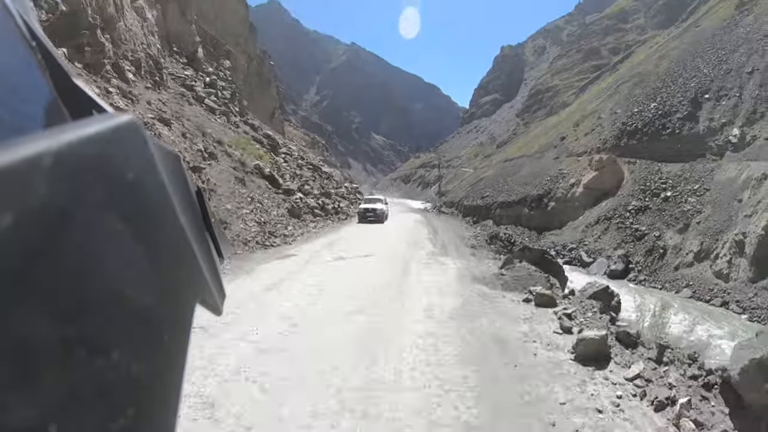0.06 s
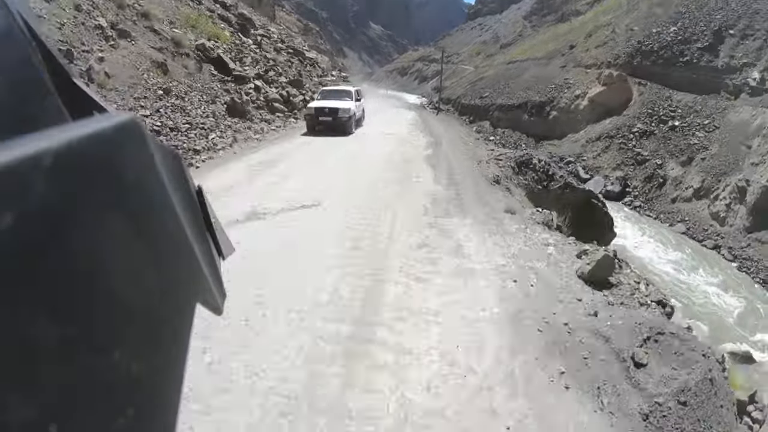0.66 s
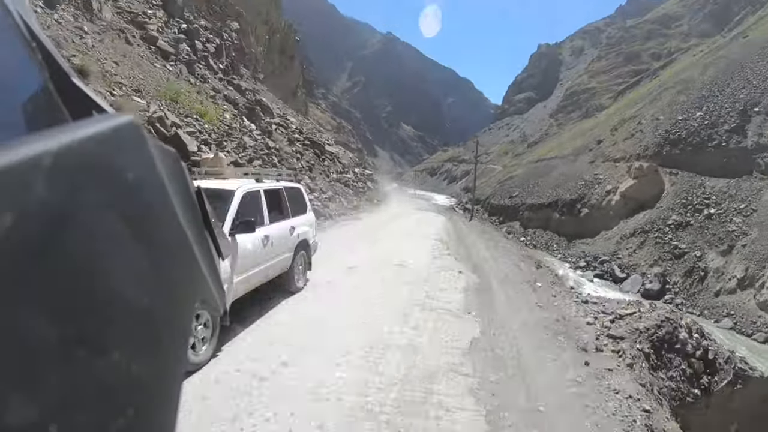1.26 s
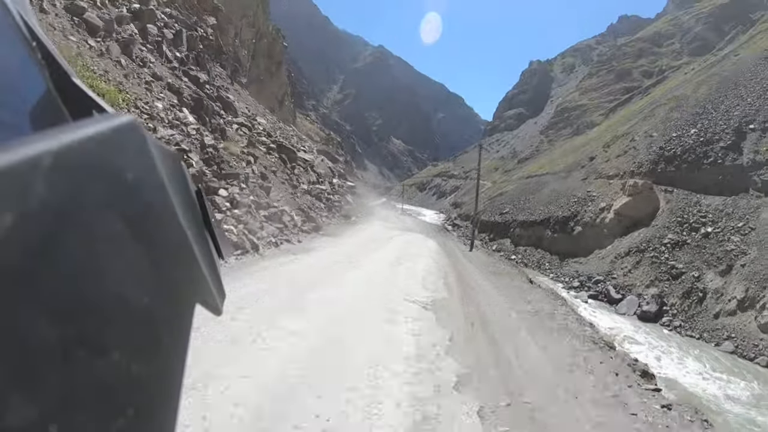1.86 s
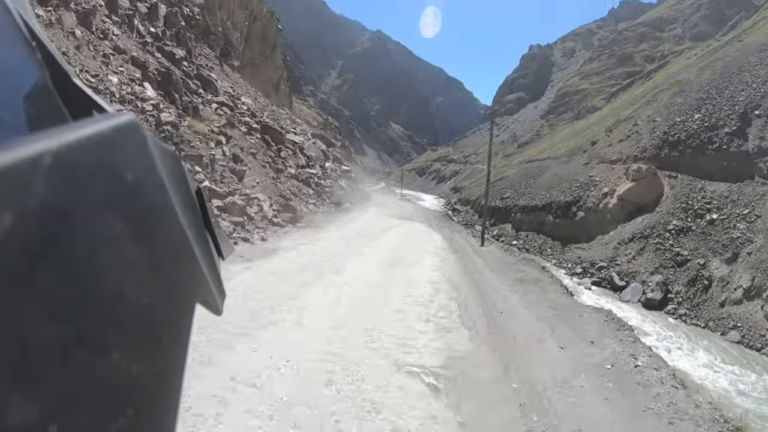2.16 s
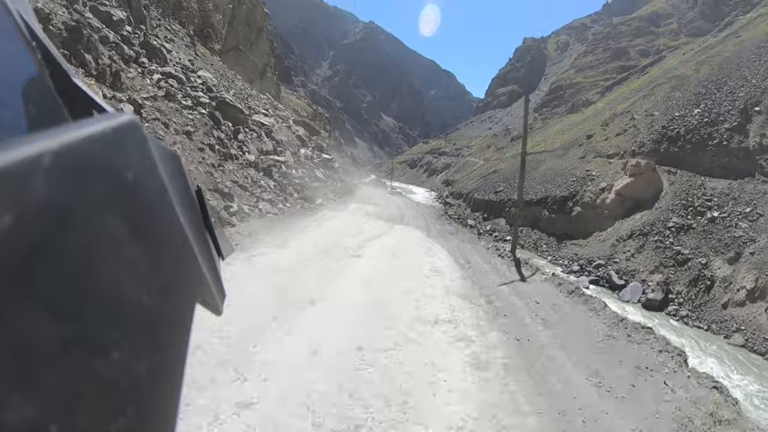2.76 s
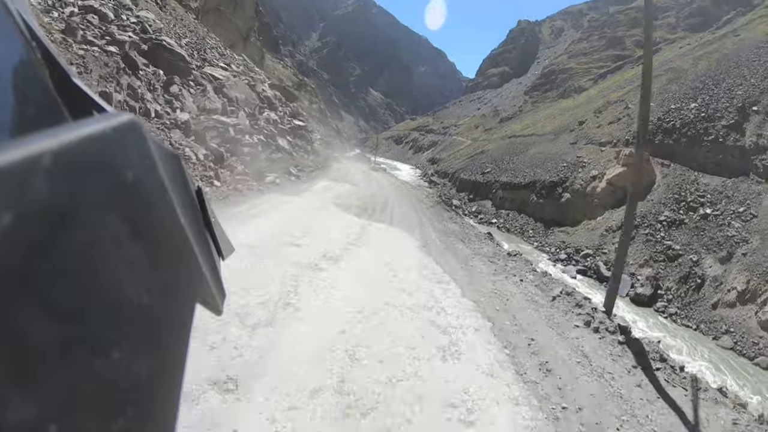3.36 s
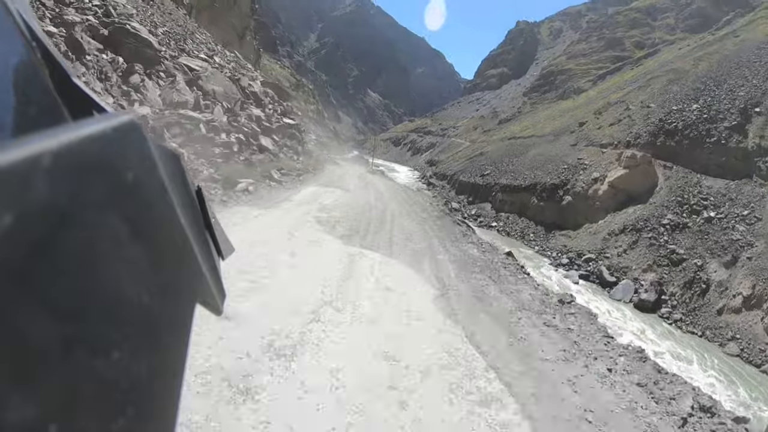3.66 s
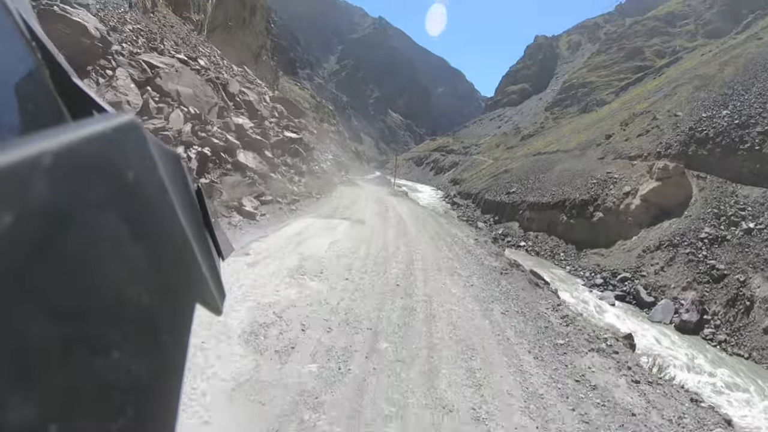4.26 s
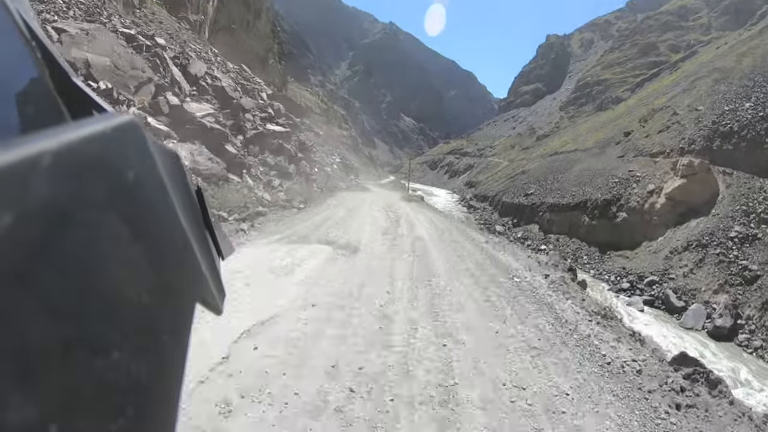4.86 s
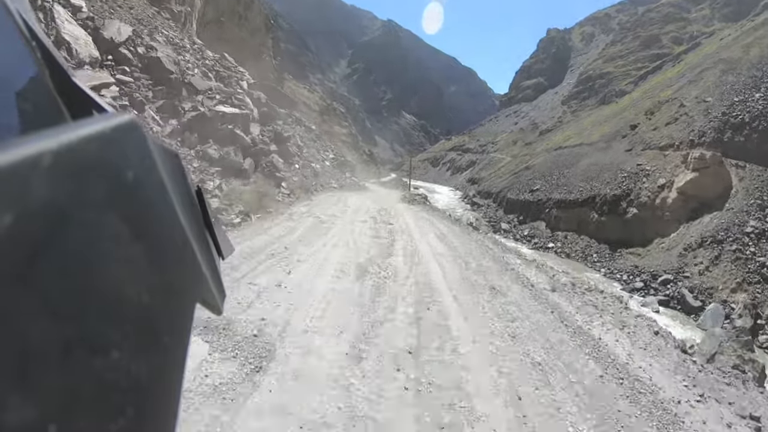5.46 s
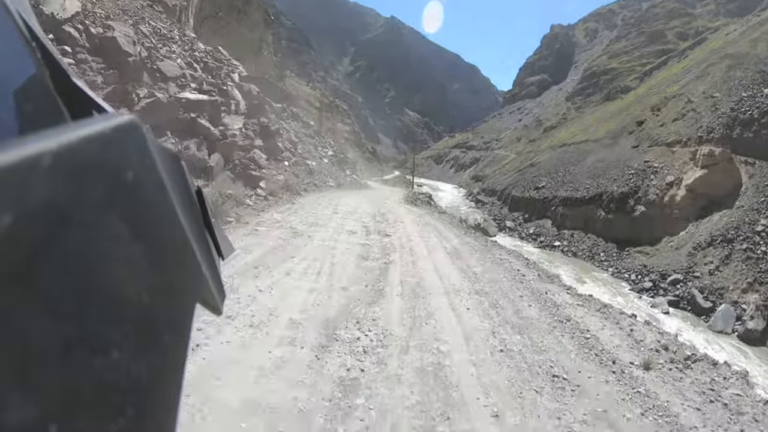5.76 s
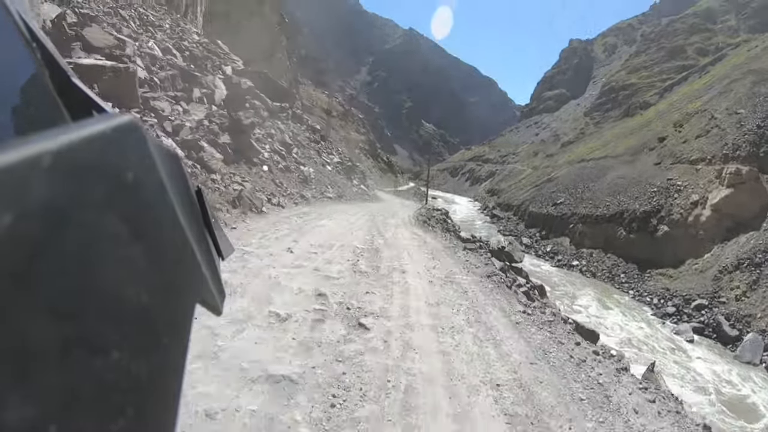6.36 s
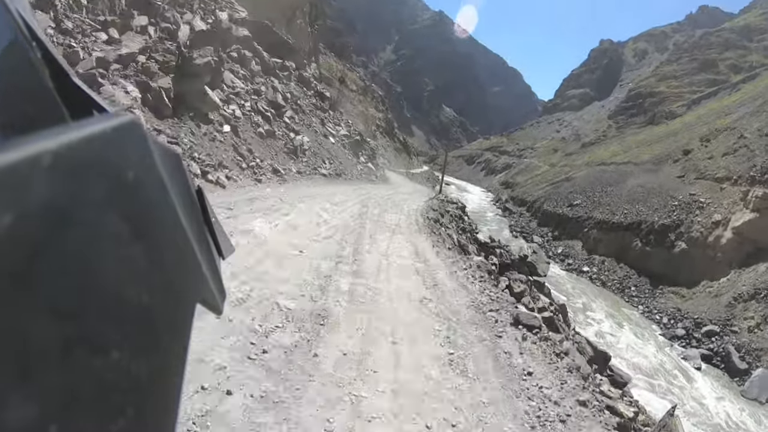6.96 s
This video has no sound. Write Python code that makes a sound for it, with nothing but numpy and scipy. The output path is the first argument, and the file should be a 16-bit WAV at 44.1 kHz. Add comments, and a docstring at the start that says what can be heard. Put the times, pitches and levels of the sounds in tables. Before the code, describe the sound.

Wind rumbles and thumps on a helmet microphone as a motorcycle accelerates briefly on a dirt road, its exhaust barking. The throttle closes and the engine settles into a low hum that sinks gradually, with light whine and clatter. The soft roar of the tyres then turns to a gravelly crunch, and flung stones tick irregularly against metal beneath the bike. The engine starts to pull lightly again at the very end.

```python
"""On a gravel mountain road, a motorcycle ride is heard from the rider's helmet.
The engine pulls for two seconds with a barking exhaust, then eases off into a low drone while its
gear teeth whine. Swirls of wind rumble and slap against the helmet. Later the tyres crunch over loose
grit, and now and then a stone is flung against the metal guard under the engine."""
import sys
import numpy as np
from scipy import signal
from scipy.fft import rfft, irfft
from scipy.io import wavfile

SR = 44100
rng = np.random.default_rng(int(sys.argv[2]) if len(sys.argv) > 2 else 0)


def int16_out(signal):
    """Quantize to a 16-bit WAV file."""
    q = np.round(np.clip(np.atleast_2d(signal).T, -1, 1) * 32767)
    wavfile.write(sys.argv[1], SR, q.astype(np.int16))


N = 313551
TIME_S = np.arange(N) / SR


# How fast the engine turns: time_s, turns_per_s
ENGINE_SPEED = [(0, 68.35), (.55, 74.36), (1, 80.32), (1.75, 86.4), (2.2, 82.8), (3.5, 80.5), (5, 76.04),
                (6.2, 70.29), (7.11, 69.7)]
# How hard it works (1 pulling, 0 coasting, -1 slowing the bike): time_s, load
ENGINE_LOAD = [(0, 0.27), (.2, 0.78), (.5, 0.82), (1.2, 0.66), (1.8, 0.63), (2, 0.34), (2.25, -0.41),
               (2.8, -0.89), (3.9, -1.09), (5.3, -0.88), (6.45, -0.57), (6.85, -0.1), (7.11, 0.27)]
# How strong its sounds are at each load: load, drone_db, bark_db, whine_db
LEVELS_BY_LOAD = [(-1, -23, -43, -52), (-0.89, -20.5, -42, -50), (0.08, -22, -40, -47.5),
                  (0.32, -22, -32, -52), (0.65, -38, -28.5, -48), (0.77, -43, -25.5, -47)]

def engine():
    """The engine barks when it pulls and drones when it holds the bike back; its speed sets the pitch."""
    speed_hz, = curves(ENGINE_SPEED)
    load, = curves(ENGINE_LOAD)
    turns = np.cumsum(speed_hz) / SR
    loads, *columns = np.transpose(LEVELS_BY_LOAD)
    drone_db, bark_db, whine_db = (np.interp(load, loads, db) for db in columns)
    fade_below_hz, fade_db_per_hz = 70.8, 9  # the drone fades at the slowest speeds
    drone_db -= fade_db_per_hz * np.maximum(fade_below_hz - speed_hz, 0)
    return (exhaust(turns, drone_db, bark_db) + gears(turns, speed_hz, whine_db)
            + clatter(turns, load) + rasp(turns, speed_hz, load))


# The tones in the exhaust pipe's bark: cycles_per_turn, level_db
BARK_TONES = [(1.5, -8), (2, -4), (2.5, -8), (3, 5), (3.5, -13), (4, -18), (5, -24.5), (10, -15)]
# The low rush of exhaust gas: pitch_hz, level_db
GAS_COLOUR = [(90, -22), (160, 5), (230, 1), (300, -2), (420, -13.5), (900, -32)]

def exhaust(turns, drone_db, bark_db):
    """The pipe drones at one cycle a turn; pulling adds higher barking tones and a rush of gas."""
    angle = 2 * np.pi * turns
    drone = np.sin(angle + .06 * wander(15)) * gain(.6 * wander(24))
    uneven_angle = angle + .07 * wander(13)  # uneven firings shake the higher tones most
    bark = 0
    for cycles_per_turn, db in BARK_TONES:
        strength = gain(db + 2 * wander(28))
        bark += strength * np.sin(cycles_per_turn * uneven_angle + 2 * np.pi * rng.random())
    bark *= gain(1.8 * wander(12))  # the wind tears at the note
    gas = colour(noise() * (1 + .5 * np.cos(angle)), GAS_COLOUR)
    return unit(drone) * gain(drone_db) + (unit(bark) + gas) * gain(bark_db - 1.5)


# The tones of gear teeth meeting: teeth_per_turn, level_db
GEAR_TONES = [(30.0, 0), (31.1, 1), (32.2, -9)]

def gears(turns, speed_hz, whine_db):
    """Gear teeth whine as they meet; the tones nearest the gear case's own note stand out."""
    case_hz, case_width_hz = 2430, 520
    whine = 0
    for teeth, db in GEAR_TONES:
        case_gain = 1 / np.hypot(1, 2 * (teeth * speed_hz - case_hz) / case_width_hz)
        slack = .95 * wander(25)  # gaps between the teeth blur each tone
        whine += gain(db) * case_gain * np.sin(2 * np.pi * teeth * turns + slack)
    return unit(whine) * gain(whine_db - 5 - .5 * wander(1.6))


# The ringing notes of the engine's cases and cooling fins: pitch_hz, width_hz, level_db
ENGINE_NOTES = [(1550, 200, -4), (2460, 55, 7), (2580, 110, -2), (2980, 100, -7), (3396, 190, -6),
                (3730, 89, -8.5), (4380, 180, -15.5)]

def clatter(turns, load):
    """Valves and chain tick once a turn and set the engine's metal ringing."""
    ticks = unit(noise() * (.78 + np.exp(-(turns % 1) / .22)))
    metal = cut_treble(ring(ticks, ENGINE_NOTES), above_hz=5400, order=5)  # soften the highest treble
    # The clatter comes in fits and starts, louder with the bright hiss and when the chain is slack.
    hiss_db, = curves(HISS_STRENGTH)
    return metal * gain(-54 + .25 * hiss_db - 2.5 * load + 2.5 * wander(14))


# The ring of the cylinder when it is knocked: pitch_hz, level_db
RASP_COLOUR = [(900, -12), (1820, 0), (2020, -7), (2190, 3), (2350, -12), (4500, -17), (7000, -42)]

def rasp(turns, speed_hz, load):
    """When the engine pulls at low speed, each firing knocks on the cylinder."""
    starts_below_hz, range_hz, decay_turns = 83, 8, .2
    slowness = np.clip((starts_below_hz - speed_hz) / range_hz, 0, 1)
    pull = np.clip(load + .3, 0, 1)
    knocks = unit(noise() * np.exp(-(turns % 1) / decay_turns))
    return colour(knocks, RASP_COLOUR) * pull * slowness * gain(-44)


# The steady flow of air over the helmet: time_s, level_db
AIRFLOW = [(0, 0), (.3, 2.5), (1.3, 1.5), (2.2, -0.5), (2.9, -2), (7.11, -0.5)]
# Swells and lulls in the wind: start_s, length_s, rumble_change_db, flutter_change_db
WIND_SWELLS = [(0.38, 0.27, 3.5, -2), (0.695, 0.343, 0, 5), (1.776, 0.2, 1.5, 4.5), (2.248, 0.41, 4, 1.5),
               (3.3, 0.088, -5, -1.5), (3.456, 0.48, 3, 1), (4.15, 0.35, -3, -2), (4.52, 0.48, 0, 0.5),
               (4.953, 0.3524, -10.5, -3), (5.565, 0.097, -5, -3), (5.657, 0.76, 0.5, 1),
               (6.423, 0.32, -3.5, -2), (6.781, .4, -3.5, 1.5)]
# The wind's three layers, from lowest to highest: pitch_hz, level_db
DEEP_COLOUR = [(12, -20), (22, -10.5), (35, -5.5), (60, 1.5), (95, 2), (140, -9.5), (300, -39.5)]
RUMBLE_COLOUR = [(40, -16.5), (85, -6.5), (125, -0.5), (180, -9.5), (260, -14), (400, -27.5), (800, -47.5)]
FLUTTER_COLOUR = [(120, -17.5), (240, -10), (340, -2), (480, -4.5), (780, -7), (1000, -11.5), (1350, -15),
                  (2500, -24), (5000, -46.5)]

def wind():
    """Big swirls of air rumble on the helmet and small ones flutter past it."""
    air_db, = curves(AIRFLOW)
    edge_s = .017
    swells_db = np.zeros((2, N))
    for start_s, length_s, *changes_db in WIND_SWELLS:
        inside_s = np.minimum(TIME_S - start_s, start_s + length_s - TIME_S)
        swells_db += np.outer(changes_db, np.clip(.5 + inside_s / edge_s, 0, 1))
    rumble_change_db, flutter_change_db = swells_db
    deep = colour(noise(), DEEP_COLOUR) * gain(-24 + .15 * rumble_change_db)
    rumble = colour(noise(), RUMBLE_COLOUR) * gain(-27.5 + .5 * air_db + rumble_change_db)
    flutter = colour(noise() * gain(1.7 * wander(47)), FLUTTER_COLOUR)
    return deep + rumble + flutter * gain(-40 + .96 * air_db + flutter_change_db)


# Sharp puffs of wind: start_s, level_db, fade_s
GUSTS = [(0.375, -30, 0.055), (0.637, -23, 0.031), (0.714, -21, 0.03), (0.756, -24.5, 0.022),
         (0.825, -30.5, 0.016), (0.847, -21.5, 0.032), (0.897, -22.5, 0.033), (0.943, -26.5, 0.033),
         (1.009, -29, 0.035), (1.077, -29, 0.042), (1.517, -33.5, 0.1), (2.287, -36.5, 0.045),
         (2.455, -33.5, 0.037), (2.595, -32, 0.018), (3.494, -33, 0.035), (3.682, -33.5, 0.025),
         (4.518, -34, 0.12), (5.415, -38, .025), (5.673, -35, 0.078)]
# The tone they share: pitch_hz, level_db
GUST_COLOUR = [(120, -15), (240, -3), (330, 2), (480, 0), (700, -7), (1000, -11), (1300, -12), (2500, -23),
               (3500, -30), (5000, -45)]

def gusts():
    """Small swirls break into puffs of noise that start sharply and die away."""
    rise_s = .002
    strength = np.zeros(N)
    for start_s, db, fade_s in GUSTS:
        age_s = np.maximum(TIME_S - start_s, 0)
        strength += gain(db) * (1 - np.exp(-age_s / rise_s)) * np.exp(-(age_s / fade_s) ** 2)
    return colour(strength * noise(), GUST_COLOUR)


# Low booms (wind on the helmet, and a last swell of the exhaust drone at 6.3 s):
# middle_s, peak_db, pitch_hz
BOOMS = [(.41, -21, 135), (.61, -21.5, 185), (1.56, -21.5, 275), (3.53, -19, 114.5), (3.72, -30.5, 138.2),
         (3.83, -26.5, 150), (4.05, -29, 140), (4.6, -17, 136), (4.82, -31, 139.5), (5.481, -20.5, 132.4),
         (6.05, -25.5, 125), (6.31, -16.5, 72)]

def booms():
    """Each boom swells and fades in about a tenth of a second, with a low, unsteady pitch."""
    half_length_s = .036
    unsteady_s = np.cumsum(1 + .2 * wander(45)) / SR
    sound = np.zeros(N)
    for middle_s, db, hz in BOOMS:
        swell = np.exp(-.5 * ((TIME_S - middle_s) / half_length_s) ** 2)
        sound += gain(db) * swell * np.sin(2 * np.pi * hz * unsteady_s)
    return sound


# Hard slaps of air: middle_s, peak_db, pitch_hz, half_length_cycles
THUMPS = [(.728, -16, 466, 1.7), (.853, -14, 396, 1), (0.903, -19, 705, 0.86), (3.039, -24.5, 699, 0.31),
          (5.677, -26, 655, 0.59), (6.381, -25, 652, 0.32)]

def thumps():
    """The hardest swirls slap the helmet with a round knock only a few cycles long."""
    sound = np.zeros(N)
    for middle_s, db, hz, half_length_cycles in THUMPS:
        cycles = (TIME_S - middle_s) * hz
        swell = np.exp(-.5 * (cycles / half_length_cycles) ** 2)
        sound += gain(db) * swell * np.sin(2 * np.pi * (cycles + rng.random()))
    return sound


# Strength of the bright hiss and crunch (engine rasp at first, loose gravel after 4.3 s):
# time_s, level_db
HISS_STRENGTH = [(0, 4), (1.2, 3.5), (2.8, 0.5), (3.55, 1.5), (4.15, 0.5), (4.6, 4), (5.7, 4.5), (5.95, 5),
                 (6.07, 0), (6.6, -2), (6.95, 5.5), (7.11, 3.5)]
# Loose pebbles under the tyres: time_s, snap_strength
PEBBLES = [(4.2, .6), (4.6, 1.8)]
# Three layers of noise, from dullest to brightest: pitch_hz, level_db
ROAR_COLOUR = [(250, -22.5), (600, 3.5), (1200, 4), (1900, 0.5), (2300, -1.5), (3200, -8.5), (4000, -12.5),
               (6000, -27), (9000, -50.5)]
CRUNCH_COLOUR = [(1500, -7), (3000, 7), (4000, -2), (5000, -2), (6000, -6), (7000, -14.5), (8200, -20),
                 (9500, -30)]
SPRAY_COLOUR = [(4000, -20), (7000, -2.5), (8300, -6.5), (9500, -5.5)]

def tyres_and_hiss():
    """The tyres roar on packed dirt; the grainy hiss on top is engine rasp first, crushed gravel later."""
    air_db, = curves(AIRFLOW)
    hiss_db, = curves(HISS_STRENGTH)
    roar = colour(noise() * gain(1.5 * wander(36)), ROAR_COLOUR)
    roar *= gain(-46 + .47 * hiss_db + .93 * air_db)
    grains_per_s, snaps_per_s, snap_decay_s = 2500, 60, .0033
    grains = (rng.random(N) < grains_per_s / SR) * noise()
    grains = unit(grains * gain(3.6 * np.minimum(rng.exponential(size=N), 5)))  # a few are much louder
    # Larger pebbles snap, each briefly lifting the crunch and the spray.
    snap_strength, = curves(PEBBLES)
    snaps = (rng.random(N) < snaps_per_s / SR) * rng.random(N)
    lift = 1 + snap_strength * signal.lfilter([1], [1, -np.exp(-1 / (snap_decay_s * SR))], snaps)
    grit = unit((.29 * grains + noise()) * lift)
    crunch = colour(grit, CRUNCH_COLOUR) * gain(-53.5 + hiss_db)
    spray = colour(grains * lift, SPRAY_COLOUR) * gain(-77.5 + 1.5 * hiss_db)
    return roar + crunch + spray


# Stones flung at the guard under the engine: start_s, level_db, decay_s
STONE_HITS = [(4.63, -41, 0.0068), (5.129, -38, .007), (5.191, -28.5, 0.016), (5.3163, -35, 0.0037),
              (5.453, -40, .004), (5.589, -38, 0.0039), (5.6893, -35, 0.0073), (5.7887, -35.5, 0.005),
              (5.853, -38, .005), (6.1915, -40, .003), (6.236, -36, 0.004), (6.794, -40, 0.0053),
              (6.8176, -40, .004), (6.8623, -38, 0.0047), (6.931, -36.5, 0.0036), (7.05, -39, .005)]
# The crack of a stone: pitch_hz, level_db
CRACK_COLOUR = [(700, -16), (1500, -2), (2600, 1), (5500, -5), (8000, -12), (9000, -35)]
# The guard's ringing notes: pitch_hz, width_hz, level_db
GUARD_NOTES = [(1491, 45, 8), (1900, 250, -2), (2490, 110, 5), (2660, 70, 5), (3050, 90, -5),
               (3510, 70, -1), (3941, 50, -3), (4813, 120, -4), (5130, 200, -7), (7500, 150, -12)]

def stones():
    """Each stone cracks against the metal guard and makes it ring."""
    strength = np.zeros(N)
    for start_s, db, decay_s in STONE_HITS:
        strength += gain(db) * (TIME_S >= start_s) * np.exp(-np.abs(TIME_S - start_s) / decay_s)
    hits = strength * noise()
    guard = cut_treble(ring(hits, GUARD_NOTES), above_hz=7900, order=6)
    return colour(hits, CRACK_COLOUR) * gain(-7.5) + guard * gain(-4.5)


def gain(db):
    """Turn decibels into a number to multiply by."""
    return 10 ** (np.asarray(db) / 20)


def unit(x):
    """Scale a sound to an average power of 1."""
    return x / np.sqrt(np.mean(x ** 2))


def curves(table):
    """Join each column's values with straight lines over time."""
    times_s, *columns = np.transpose(table)
    return [np.interp(TIME_S, times_s, column) for column in columns]


def noise():
    """An even hiss (white noise) with a power of 1."""
    return rng.standard_normal(N)


def wander(rate_hz):
    """A smooth random drift of typical size 1, up to about the given rate."""
    grid_hz = np.fft.rfftfreq(N, 1 / SR)
    return unit(irfft(rfft(noise()) * np.exp(-.5 * (grid_hz / rate_hz) ** 2), N))


def colour(x, outline):
    """Make some pitches stronger and others weaker; white noise keeps its power."""
    hz, db = np.transpose(outline)
    grid_hz = np.maximum(np.fft.rfftfreq(2 * N, 1 / SR), 1)
    shape = gain(np.interp(np.log(grid_hz), np.log(hz), db))
    shape = unit(shape / (1 + (grid_hz / hz[-1]) ** 2))
    # Fold the filter in time so that nothing rings before the sound that starts it.
    cepstrum = irfft(np.log(shape))
    cepstrum[1:N] *= 2
    cepstrum[N + 1:] = 0
    return irfft(rfft(x, 2 * N) * np.exp(rfft(cepstrum)))[:N]


def ring(x, notes):
    """Let a sound ring an object's notes; narrower notes ring longer."""
    grid_hz = np.maximum(np.fft.rfftfreq(2 * N, 1 / SR), 1)
    response = sum(gain(db) / (1 + 1j * (grid_hz - hz ** 2 / grid_hz) / width_hz)
                   for hz, width_hz, db in notes)
    response /= np.sqrt(np.mean(np.abs(response) ** 2))
    return irfft(rfft(x, 2 * N) * response)[:N]


def cut_treble(x, above_hz, order):
    """Soften the high pitches; a higher order cuts more steeply."""
    return signal.sosfilt(signal.butter(order, above_hz, fs=SR, output="sos"), x)


def scene():
    """Engine, wind and road reach the helmet together, in one channel."""
    return (engine() + wind() + gusts() + booms() + thumps() + tyres_and_hiss() + stones())[None]


def record(dry):
    """The helmet microphone rounds off the loudest peaks and loses the highest treble."""
    return cut_treble(np.tanh(dry), above_hz=8775, order=8)


dry = scene()
out = record(dry)
int16_out(out)
```